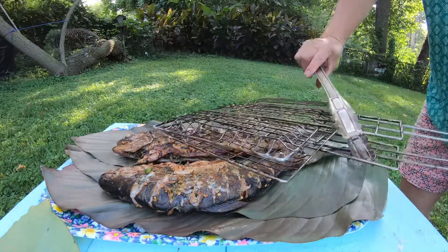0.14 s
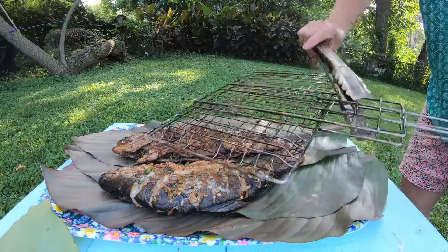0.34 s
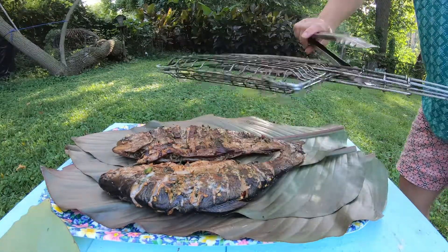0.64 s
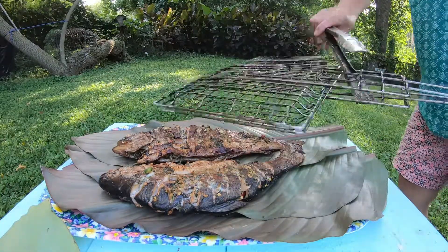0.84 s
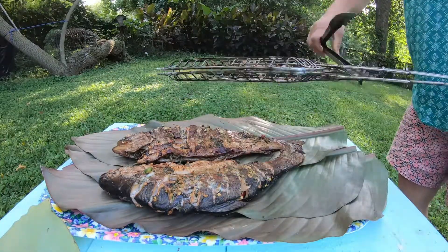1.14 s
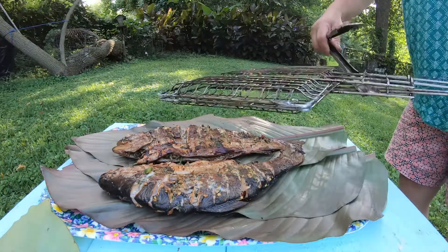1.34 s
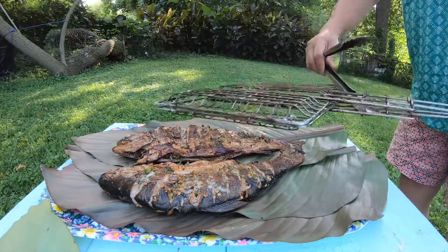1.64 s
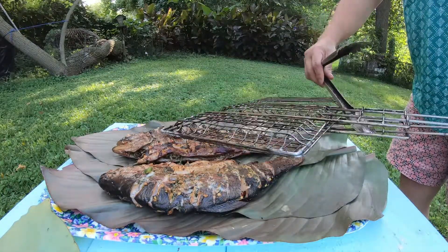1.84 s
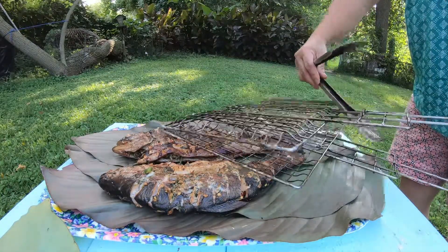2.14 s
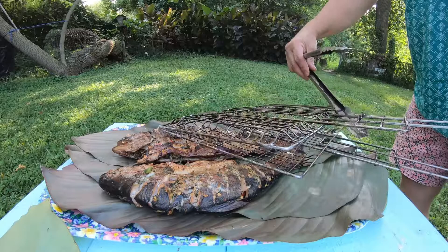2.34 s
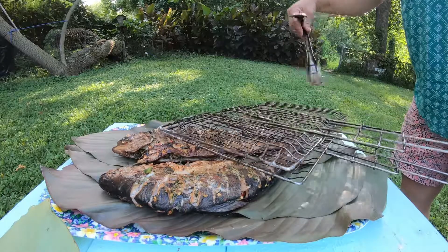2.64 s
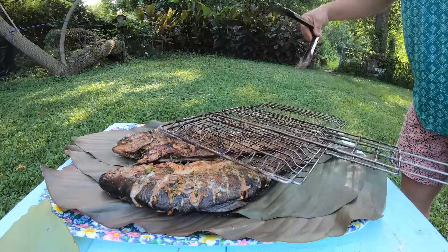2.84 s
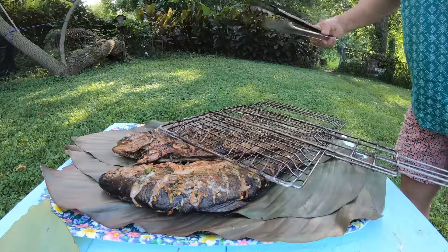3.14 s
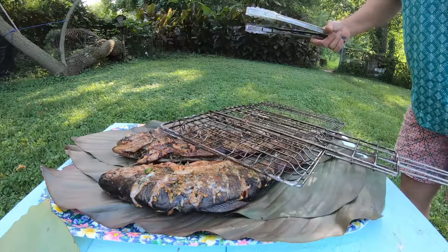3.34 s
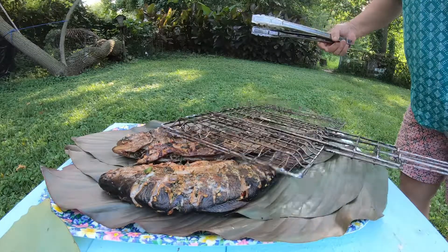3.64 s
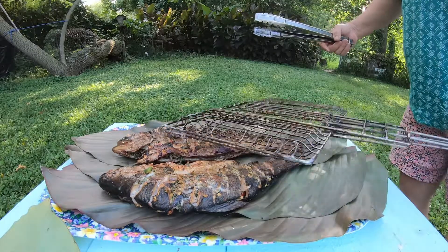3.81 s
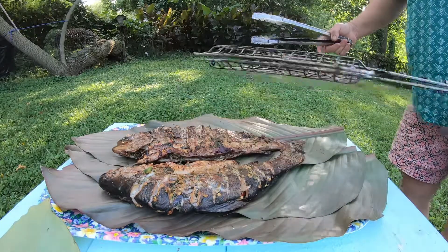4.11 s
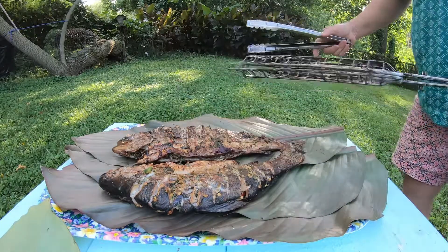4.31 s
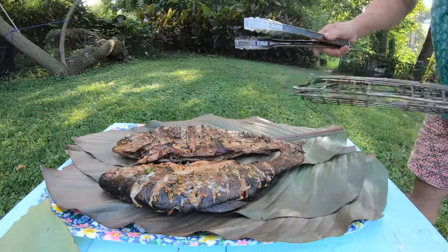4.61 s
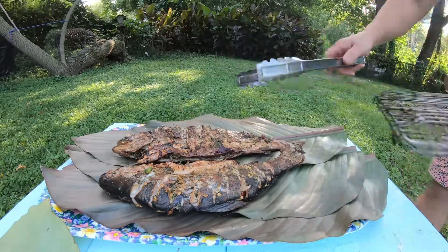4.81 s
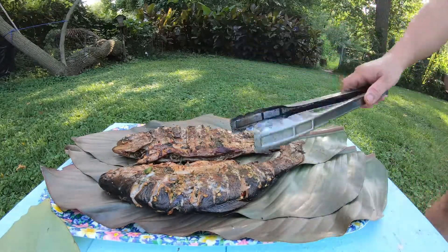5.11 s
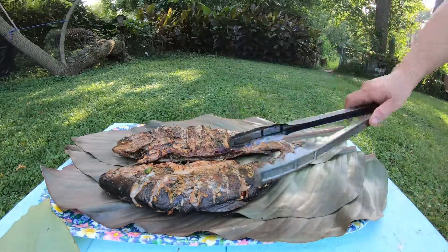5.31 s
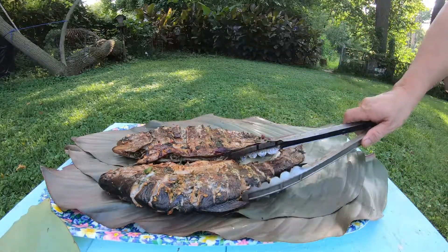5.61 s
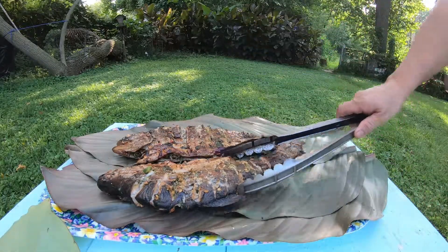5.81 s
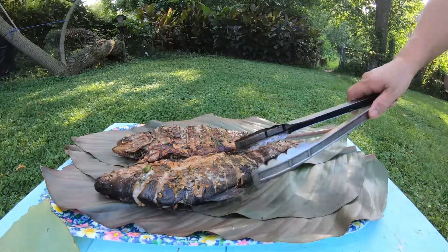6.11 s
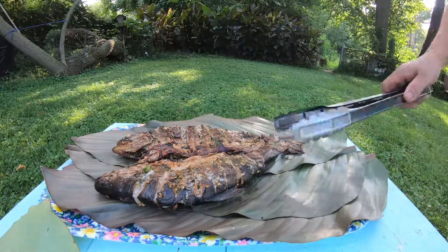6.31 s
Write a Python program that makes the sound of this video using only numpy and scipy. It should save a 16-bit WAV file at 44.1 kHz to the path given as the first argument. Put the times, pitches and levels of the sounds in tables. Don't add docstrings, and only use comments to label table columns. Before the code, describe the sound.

A small stereo camera very near the table catches dry metal ticks, wire slides and leafy rubbing. About two seconds in, the basket lands heavily and shakes the camera, then tongs grate across the bars. Two lighter drops follow, then a calmer stretch with only insects, and finally sparse dull ticks and rustling. The open lawn is filled with a high insect drone, a nearby fast cricket trill and faint traffic rumble.

```python
import sys
import numpy as np
from scipy import signal
from scipy.fft import rfft, irfft, next_fast_len
from scipy.io import wavfile
from scipy.ndimage import uniform_filter1d

SR = 44100
rng = np.random.default_rng(int(sys.argv[2]) if len(sys.argv) > 2 else 0)


def store_wav(level_fs):
    pcm = np.round(np.clip(np.atleast_2d(level_fs), -1, 1) * 32767)
    wavfile.write(sys.argv[1], SR, pcm.T.astype(np.int16))


def makeup_ratio(level_db):
    decades = np.asarray(level_db, float) / 20
    return 10 ** decades


N = 284886
TIME = np.arange(N) / SR


def level(x, db):
    return x * makeup_ratio(db) / np.sqrt(np.mean(x ** 2))


def peak(x):
    return x / np.abs(x[0]).max()


def shape(spectrum, hz):
    f_hz, db = np.transpose(spectrum)
    return np.interp(np.log(hz), np.log(f_hz), db)


def band(x, hz, width_hz, order=1):
    edges_hz = np.clip([hz - width_hz / 2, hz + width_hz / 2], 10, .45 * SR)
    return signal.sosfilt(signal.butter(order, edges_hz, "band", fs=SR, output="sos"), x)


def walk(rate_hz):
    hold = int(SR / rate_hz)
    held = np.repeat(rng.standard_normal(N // hold + 1), hold)
    return 1.42 * uniform_filter1d(uniform_filter1d(held, hold), hold)[:N]


def pair(mid, side, side_db, pan_db=0.):
    both = mid + makeup_ratio(side_db) * side * np.array([[1], [-1]])
    return both * makeup_ratio(np.array([[pan_db], [-pan_db]]) / 2)


def grit(size, spread_db):
    size_db = spread_db * np.minimum(rng.exponential(size=size), 5)
    return rng.standard_normal(size) * makeup_ratio(size_db)


def ring(push, hz, t60_s, db):
    t = np.arange(int(.1 * SR))[:, None] / SR
    decay = np.exp(-np.log(1000) * t / t60_s)
    modes = (makeup_ratio(db) * decay * np.sin(2 * np.pi * hz * t)).sum(axis=1)
    return peak(signal.fftconvolve(push, modes[None], axes=1)[:, :push.shape[1]])


def add(out, s, sound):
    i = int(s * SR)
    out[:, i:i + sound.shape[1]] += sound[:, :N - i]


def clinks(blows, body, ring_share, rise, body_hz, side_db, pan_db):
    # f/Hz, t60/s
    table_modes = [(250, 0.053), (430, 0.063), (705, 0.028)]
    out, t = np.zeros((2, N)), np.arange(int(.15 * SR)) / SR
    hz, db, t60_s = np.transpose(body)
    contacts = grit((len(blows), 2, len(t)), 2.92)
    scatter = rng.standard_normal((len(blows), 2, len(hz)))
    crack_share = 1 - ring_share
    top = 0
    for (s, peak_db, treble_db, thud_db, ring_hz, ms), push, (detune, gain) in zip(blows, contacts, scatter):
        u = t / (ms / 1000)
        tail = makeup_ratio(-17) * np.exp(-t / .012)
        push = push * np.minimum(u / rise, 1) * (np.exp(-u ** 4) + tail)
        f_hz, g_db = hz * (1 + 0.0375 * detune), db + 2 * gain
        top = hz > 5500

        low_hz = np.append(f_hz[~top], ring_hz)
        low_t60_s = np.append(t60_s[~top], t60_s.mean())
        low_db = np.append(g_db[~top], 5.)
        crack_hz = np.sqrt(ring_hz * body_hz)
        crack = peak(band(push, crack_hz, 1.17 * crack_hz, order=2))
        lower = ring_share * ring(push, low_hz, low_t60_s, low_db) + crack_share * crack
        thud = ring(push, *np.transpose(table_modes), 0)
        sound = pair(*(peak(lower) + makeup_ratio(thud_db) * thud), side_db, pan_db)

        hiss = peak(band(push, 7330, 4400, order=2))
        upper = ring_share * ring(push, f_hz[top], t60_s[top], g_db[top]) + crack_share * hiss
        upper = pair(*peak(upper), side_db, 3.)
        upper[0] = np.roll(upper[0], 1)
        add(out, s, makeup_ratio(peak_db) * (sound + makeup_ratio(treble_db) * upper))
    return out


def air():
    # f/Hz, density/dB
    spectrum = [(24, -35), (40, -5.5), (129, 0), (213, -10.5), (449, -28.5), (548, -33), (817, -26),
                (949, -30), (2270, -35.5), (4570, -27), (5170, -30.5), (6010, -27.5), (7910, -24),
                (10900, -36.5), (15500, -39)]
    # f/Hz, side minus mid/dB
    side_spectrum = [(60, -12), (150, -16.5), (380, -4.5), (700, 2.5), (1400, 3), (3000, -3.5), (6000, -6),
                     (15000, -4)]
    # loudest t/s, swell/dB, half length/s
    passes = [
        (1.35, 1.5, 0.43),
        (2.062, 3.5, 0.29),
        (3.637, 2, 0.38),
        (5.344, 3.5, 0.45),
        (6.46, 3, 0.23),
    ]
    size = next_fast_len(N)
    hz = np.fft.rfftfreq(size, 1 / SR) + 1
    swell_db = sum(db * np.exp(-((TIME - s) / half_s) ** 2) for s, db, half_s in passes)
    swell_db = swell_db + 1.33 * walk(12) + 0.78 * walk(3.91)
    mid, side = rfft(rng.standard_normal((2, size))) * makeup_ratio(shape(spectrum, hz))
    side = side * makeup_ratio(shape(side_spectrum, hz))
    out = 0
    for centre in np.arange(4, 15):
        octave = np.cos(np.pi / 2 * np.clip(np.log2(hz) - centre, -1, 1)) ** 2
        low = np.clip(400 / 2 ** centre, 0, 1)
        flicker_db = 3.3 if centre < 7 else 2 * low
        gain_db = low * swell_db + flicker_db * walk(7) + walk(3)
        out = out + makeup_ratio(gain_db) * pair(irfft(mid * octave, size)[:N], irfft(side * octave, size)[:N], 0)
    return level(out, -49.5)


def chorus():
    # f/Hz, width/Hz, level/dB
    wings = [(5060, 340, -13), (5220, 380, -14.5), (7370, 590, -2), (7815, 450, 2.5), (8250, 770, 2),
             (9280, 1500, -9)]
    chorus_db, rise_db_per_s = -60.5, 0.34

    def wing(hz, width_hz, db):
        clicks = band(grit(N, 3.5), hz, width_hz, order=2)
        return level(clicks, db) * makeup_ratio(0.83 * walk(12))

    mid = sum(wing(*row) for row in wings)
    side = sum(wing(*row) for row in wings[:2])
    return pair(mid, side, 0, -1.6) * makeup_ratio(chorus_db + rise_db_per_s * TIME + .5 * walk(2.2))


def cricket():
    bout_starts = [
        -.0335,
        .8936,
        5.1762,
    ]
    # t/s, level/dB
    effort = [(0, -58), (.6, -67.5), (1.2, -62.5), (2.4, -62), (3.4, -56), (4.1, -58), (4.3, -76.5),
              (5.1, -79), (5.35, -62), (6.46, -62)]
    strokes_per_s, wing_hz, wing_hz_per_db = 25.58, 7110, 55
    starts = np.array(bout_starts)
    beat = strokes_per_s * (TIME - starts[np.searchsorted(starts, TIME) - 1])
    db = np.interp(TIME, *np.transpose(effort))
    hz = wing_hz + wing_hz_per_db * np.maximum(db + 61, -2)
    stroke = beat % 1 / .75
    swell = np.where(stroke < 1, np.sin(np.pi * np.minimum(stroke, 1) ** 1.6) ** .7, 0)
    flutter = 1 + 0.49 * np.cos(2 * np.pi * 3.02 * stroke + 0.79 * walk(30))
    sag = 1 - .05 * np.clip((stroke - .68) / .15, 0, 1) + .006 * walk(150)
    tone = swell * flutter * makeup_ratio(1.3 * walk(25)) * np.sin(2 * np.pi * np.cumsum(hz * sag) / SR)
    echo = np.roll(tone, 310)
    return pair(level(tone + 0.45 * echo, 0), level(echo, 0), -30, -1.) * makeup_ratio(db)


def rustle():
    # start t/s, length/s, level/dB
    dull_rubs = [(0, .156, -59.5), (.278, .122, -58), (.44, .183, -59), (1.732, .143, -69),
                 (1.996, .18, -56.5), (2.158, .342, -59), (3.295, .07, -56), (3.498, .128, -55),
                 (3.614, .108, -57), (4.0, .152, -61), (4.237, .117, -62.5), (4.967, .453, -60.5),
                 (5.782, .052, -48.5), (5.85, .22, -63)]
    # start t/s, length/s, level/dB
    slides = [
        (.193, .12, -50),
        (.704, .15, -57),
        (.806, 0.22, -57.5),
        (.973, 0.21, -68.5),
        (4.47, .16, -62.5),
        (5.72, 0.14, -58),
        (6.134, 0.28, -59),
    ]
    dull_shine_db, wire_shine_db = -7, 0
    rubs = [grit(N, 2.) * makeup_ratio(2.5 * walk(60) + .4 * walk(14)) for _ in range(2)]

    def rubbed(hz, width_hz):
        mid, side = [level(band(rub, hz, width_hz, order=2), 0) for rub in rubs]
        return pair(mid, side, -2.5, -5.1)

    dull, bright = rubbed(2200, 2730), rubbed(8000, 2800)
    out = 0
    for strokes, shine_db in [(dull_rubs, dull_shine_db), (slides, wire_shine_db)]:
        for start_s, length_s, db in strokes:
            swell = np.sin(np.pi * np.clip((TIME - start_s) / length_s, 0, 1)) ** 0.83
            out = out + makeup_ratio(db) * swell * (dull + makeup_ratio(shine_db) * bright)
    return out


def thumps():
    # t/s, level/dB, f/Hz, t60/s
    bounces = [
        (1.992, -32, 53.3, 0.4),
        (2.041, -26, 51.8, 0.47),
        (2.07, -39, 93, 0.23),
        (2.073, -33, 227, 0.058),
        (1.904, -43, 278, 0.08),
        (2.275, -56, 70, 0.092),
        (3.311, -46, 54.7, 0.78),
        (3.67, -56, 59, 0.35),
    ]
    out, t = np.zeros((2, N)), np.arange(int(.4 * SR)) / SR
    for s, db, hz, t60_s in bounces:
        decay = np.exp(-np.log(1000) * t / t60_s)
        swing = np.sin(2 * np.pi * hz * t) * decay * np.minimum(t / 0.0016, 1)
        add(out, s, makeup_ratio(db) * np.outer([1.7, -.3], swing))
    return out


def basket():
    # f/Hz, level/dB, t60/s
    wires = [(1190, -1, 0.021), (1650, -23, 0.051), (1680, -12, 0.032), (1900, -36, 0.12), (2034, -2, 0.03),
             (2590, -3, 0.033), (3320, 4, 0.015), (4000, -35, 0.012), (6530, -3, 0.013), (7640, -3, 0.0043),
             (9720, -2, 0.015)]
    # t/s, peak/dB, thud/dB, loudest ring f/Hz, rattle/ms
    landings = [
        (1.9, -42.5, 5, 1380, 14),
        (1.916, -41, -2.5, 1840, 39),
        (1.949, -29, -8, 1820, 54),
        (1.97, -15.5, -38, 3200, 15),
        (1.986, -26, -15, 1750, 60.4),
        (2.071, -37, 2, 1100, 12.3),
        (3.314, -36.5, -7.5, 2830, 25),
        (3.6722, -32.5, -10, 3030, 4.3),
    ]
    # t/s, peak/dB, treble/dB, loudest ring f/Hz, rattle/ms
    grazes = [(.199, -51, 18, 5240, 19), (.255, -34, -17, 2250, 14), (.837, -38.5, 1, 5630, 54),
              (1.769, -48.5, -7, 1060, 5.4), (2.022, -26, -1, 2140, 8.6), (2.195, -41, -8, 4000, 7.9),
              (2.2077, -43, -8, 4070, 9), (3.311, -39, 5.5, 2850, 9), (3.513, -41, -3, 1550, 58),
              (3.5414, -32, -2.5, 3370, 10.3), (4.2592, -51.5, -12, 2540, 18),
              (5.734, -38.5, -15, 4140, 27)]
    landing_treble_db, graze_thud_db = -19.5, -24
    blows = [(s, db, landing_treble_db, thud_db, hz, ms) for s, db, thud_db, hz, ms in landings]
    blows += [(s, db, treble_db, graze_thud_db, hz, ms) for s, db, treble_db, hz, ms in grazes]
    return clinks(blows, wires, ring_share=0.58, rise=0.031, body_hz=1760, side_db=-10, pan_db=-3.0)


def scrape():
    # f/Hz, level/dB, t60/s
    bars = [(1550, -4.5, 0.028), (3430, -1.5, 0.15), (4000, 4, 0.067), (4720, 3.5, 0.057), (5360, 1, 0.07),
            (6510, 5, 0.07), (7500, 5.5, 0.066), (10570, 0, 0.03)]
    # t/s, peak/dB
    slips = [(2.2367, -49), (2.268, -46), (2.2766, -37), (2.287, -39), (2.302, -42), (2.3167, -39),
             (2.327, -39), (2.357, -36), (2.372, -34), (2.3877, -37), (2.395, -41), (2.406, -36.5),
             (2.4164, -35.5), (2.4258, -42), ]
    treble_db, thud_db, ring_hz, rattle_ms = -2, -39, 3420, 9
    blows = [(s, db, treble_db, thud_db, ring_hz, rattle_ms) for s, db in slips]
    return clinks(blows, bars, ring_share=0.44, rise=0.15, body_hz=3570, side_db=-17, pan_db=-4.5)


def tongs():
    # f/Hz, level/dB, t60/s
    steel = [(1490, -5, 0.0086), (2590, -8, 0.012), (3450, -8, 0.02), (4600, -4, 0.01), (5340, -8, 0.01),
             (6480, -2, 0.012), (8230, 4, 0.012), (9200, -6, 0.0081)]
    # t/s, peak/dB, treble/dB, loudest ring f/Hz
    ticks = [(.0094, -41, -14, 2800), (0.0777, -47.5, -2, 2790), (0.1092, -32.5, -2, 4700),
             (0.2052, -30.5, 5.5, 4900), (0.2463, -11.5, 0.5, 3800), (0.3208, -30, -12, 3500),
             (0.49, -27.5, -2, 4820), (.574, -48, 11.5, 4320), (.6524, -53, 3, 4500),
             (0.6916, -45.5, -8, 3320), (0.7451, -31.5, -7, 3710), (0.7929, -32, 6.5, 4700),
             (0.8547, -31.5, 9, 5500), (0.9127, -29, -2, 3680), (0.924, -35, -20, 2870),
             (.9475, -28.5, 3, 4870), (0.9523, -34.5, 11, 4600), (1.1001, -36.5, 11.5, 5240),
             (1.1616, -47, 14, 4350), (1.224, -46.5, 14, 4370), (3.159, -41, 7.5, 5330),
             (5.3622, -42.5, -15, 1900), (5.4898, -36, -9, 3880), (5.5445, -47, 10.5, 3850),
             (5.8253, -34.5, -25, 1756), (5.9546, -35, -12, 3780), (5.9852, -49, -8, 2640),
             (6.019, -50, -17, 3800)]
    thud_db = -62.5
    rattle_ms, rattle_ms_per_db = 4.8, .04
    blows = [(s, db, treble_db, thud_db - db, hz, rattle_ms + rattle_ms_per_db * treble_db)
             for s, db, treble_db, hz in ticks]
    return clinks(blows, steel, ring_share=.36, rise=0.55, body_hz=3080, side_db=-10, pan_db=-4.0)


def scene():
    background = air() + chorus() + cricket()
    return background + rustle() + thumps() + basket() + scrape() + tongs()


def low_pass(x):
    return signal.sosfilt(signal.butter(12, 15830, fs=SR, output="sos"), x)


def record(dry):
    dip_hz, dip_width_hz, dip_share = 8880, 290, .42
    bottom_hz, top_hz = 40, 15500
    mix = dry - dip_share * band(dry, dip_hz, dip_width_hz) * np.array([[1], [0]])
    mix = signal.sosfilt(signal.butter(2, bottom_hz, "high", fs=SR, output="sos"), mix)
    mix = signal.sosfilt(signal.ellip(8, .2, 70, top_hz, fs=SR, output="sos"), mix)
    return low_pass(mix)


dry = scene()
out = record(dry)
store_wav(out)
```